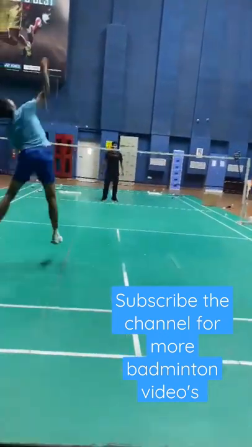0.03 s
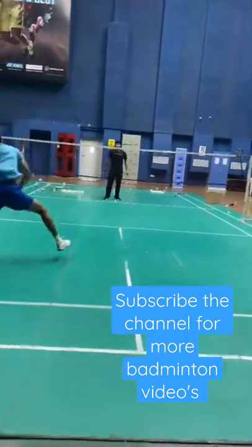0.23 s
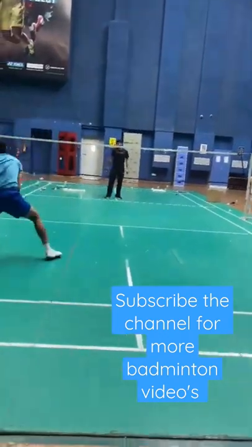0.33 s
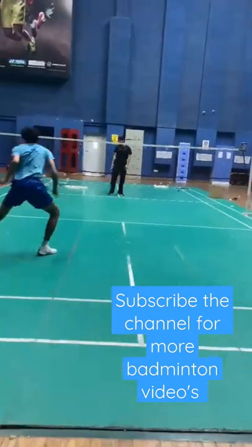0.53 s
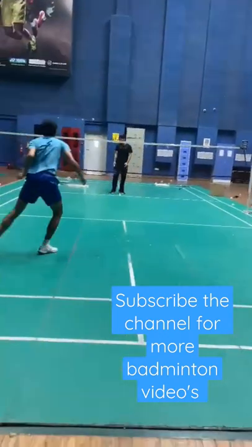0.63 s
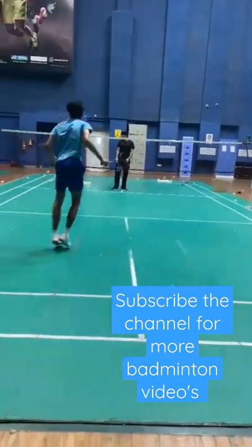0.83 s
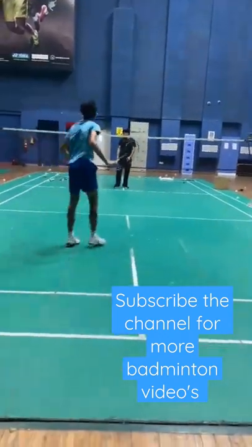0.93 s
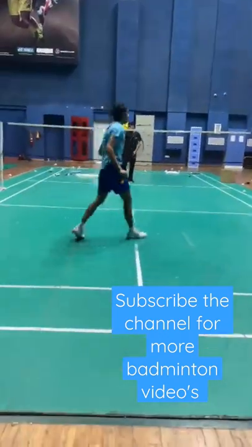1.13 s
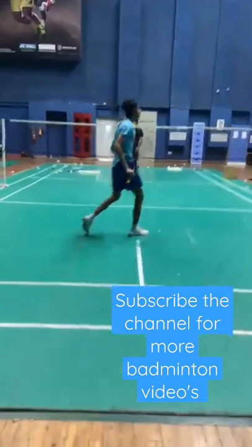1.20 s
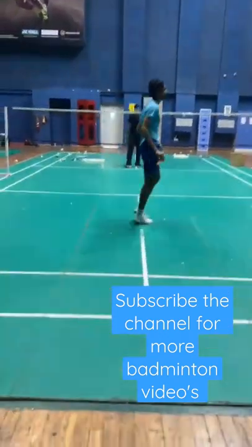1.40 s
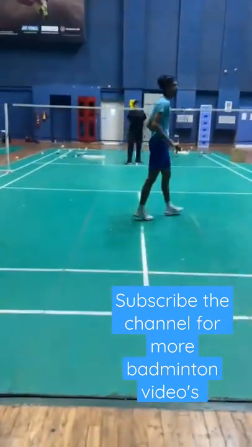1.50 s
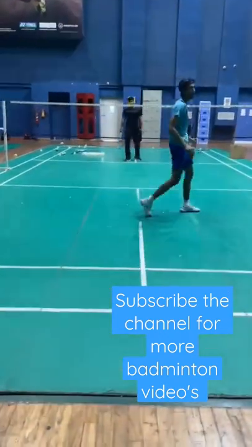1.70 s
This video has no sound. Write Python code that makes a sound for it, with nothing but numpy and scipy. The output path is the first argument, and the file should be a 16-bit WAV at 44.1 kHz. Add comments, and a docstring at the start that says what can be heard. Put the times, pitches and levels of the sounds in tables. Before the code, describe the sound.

One sharp badminton smash, with a quick swish before it, rings through a large sports hall. A phone a few metres off picks up the slapping, thudding landing, then quieter steps over a low room rumble.

```python
"""A racket swishes and cracks against a shuttle: a badminton smash in a large sports hall.
The strings ring briefly; the player lands, soles slapping the mat and the sprung floor booming,
then walks off while the hall rings out over its steady air noise.
Heard from a few metres away, through the two microphone ports of a phone."""
import sys
import numpy as np
from scipy import signal
from scipy.fft import rfft, irfft
from scipy.io import wavfile

SR = 44100
rng = np.random.default_rng(int(sys.argv[2]) if len(sys.argv) > 2 else 0)


def digitize_waveform(pressure):
    """Quantize a signal to 16-bit integers and store it at the path in sys.argv[1].

    Rows of a 2-D input are taken as channels; values are limited to [-1, 1].
    """
    field = np.atleast_2d(pressure).T
    bounded = np.clip(field, -1, 1)
    quanta = np.round(bounded * 32767).astype(np.int16)
    wavfile.write(sys.argv[1], SR, quanta)


N = 77175
SMASH_S = .229
OPPOSED = np.array([[1], [-1]])  # plus at the left port, minus at the right

# Spectrum of the crack, a few metres off: freq_hz, relative_db
CRACK_SPECTRUM = [(200, -10), (450, 2), (750, 4), (1200, -1), (1700, -7), (2700, -0.5), (4500, -2),
                  (5900, 0.5), (7000, -2), (7900, -19), (9000, -11), (10800, -5), (12000, -24)]


def smash():
    """Cork on strings: a crack, heard again by way of the floor, and the shuttle's hollow pop."""
    floor_bounce_s = .0033
    blows = sum(burst(SMASH_S + lag, rise_s=.00067, decay_s=.0037) for lag in (0, floor_bounce_s))
    crack = undb(-13) * coloured(CRACK_SPECTRUM) * blows
    pop = boom(SMASH_S + .0015, level_db=-8.5, pitch_hz=297, rise_s=.0036, steepness=3.6)
    return crack + pop


# Modes of the string bed: pitch_hz, level_db, t60_s
STRING_MODES = [(1247, -22.5, .045), (2063, -27, .04), (2590, -26, .045), (2767, -19.5, .05),
                (3155, -26, .045), (3380, -18.5, .045), (3748, -20, .045), (4206, -24, .04),
                (4414, -24, .05), (4640, -22, .055), (5056, -20.5, .04), (5420, -22, .03),
                (5663, -17.5, .035), (5900, -18, .035), (6090, -21, .035), (8950, -30, .03),
                (10790, -28, .035)]


def strings():
    """The string bed rings briefly; its modes reach the two ports out of step."""
    t, out = clock(), 0
    for hz, db, t60 in STRING_MODES:
        port_phase = np.arctan(undb(along_hz(hz, STEREO_WIDTH))) * OPPOSED
        envelope = undb(db) * burst(SMASH_S, rise_s=.002, decay_s=t60 / np.log(1000))
        out = out + envelope * np.sin(2 * np.pi * (hz * t + rng.random()) + port_phase)
    return out


# Whistle of the racket frame through the stroke: time_s, pitch_hz, level_db
WHISTLE_PATH = [(.172, 400, -62), (.193, 640, -42), (.207, 860, -34), (.218, 1100, -41), (.229, 1300, -41),
                (.245, 900, -64)]
# Brief hiss just before the crack: freq_hz, relative_db
HISS_SPECTRUM = [(1000, 7.5), (2700, 9), (3600, 3), (5000, 5.5), (7000, 0), (12000, 1)]


def swing():
    """Eddies off the frame whistle higher as the racket speeds up; a hiss swells before the crack."""
    t = clock()
    times, hz, db = np.array(WHISTLE_PATH).T
    mean_hz, relative_width = hz.mean(), .097
    eddies = signal.hilbert(noise(np.exp(-.5 * ((bins() / mean_hz - 1) / relative_width) ** 2)))
    glide = np.exp(2j * np.pi * np.cumsum(np.interp(t, times, hz) - mean_hz) / SR)
    envelope = undb(np.interp(t, times, db)) * (t > times[0]) * (t < times[-1])
    hiss_rise = np.exp(-abs(t - SMASH_S) / .011) * (t < SMASH_S)
    return (eddies * glide).real * envelope + undb(-23.5) * coloured(HISS_SPECTRUM) * hiss_rise


# Soles on the court mat: start_s, level_db, crest_pitch_hz, rise_s, scuff_relative_db
SOLE_SLAPS = [(.3098, -18.5, 1600, .0042, -8), (.4345, -11.5, 1370, .0021, -10),
              (.4444, -19.5, 900, .0015, -9), (1.0503, -35, 600, .0012, -2), (1.278, -48, 1200, .0023, 8)]
# Scuff of a sole: freq_hz, relative_db
SCUFF_SPECTRUM = [(300, 12), (750, 5), (1200, 7.5), (1900, 5), (2600, 2.5), (4200, 1.5), (6200, -14),
                  (7600, -6), (9000, -11), (11000, -16), (13000, -35)]


def soles():
    """Each sole squeezes air out from the mat: a hard clap that sweeps down in pitch, and a scuff."""
    fall_octaves = .8  # from first touch to the crest
    out, friction = 0, coloured(SCUFF_SPECTRUM)
    for start, db, hz, rise, scuff_db in SOLE_SLAPS:
        pitch = hz * 2 ** (fall_octaves * (1 - age(start) / rise))
        phase = 2 * np.pi * (np.cumsum(pitch) / SR + rng.random())
        clap = swell(start, rise, steepness=6.2) * np.sin(phase)
        scuff = undb(scuff_db) * swell(start, rise, steepness=1.35) * friction
        out = out + undb(db) * (clap + scuff)
    return out


# Heels on the boards: start_s, level_db, pitch_hz, rise_s
HEEL_KNOCKS = [(.316, -19, 280, 0.004), (.433, -30, 308, 0.011), (.437, -27.5, 729, 0.0081),
               (.492, -24.5, 306, 0.0081), (1.115, -43, 271, 0.017), (1.246, -47.5, 303, 0.025)]
# Weight coming down on the floor: start_s, level_db, pitch_hz, rise_s
FLOOR_THUDS = [(.326, -20.5, 79.6, 0.027), (0.371, -23.5, 80, 0.017), (0.405, -22, 98.5, 0.045),
               (0.4431, -6, 98, 0.018), (0.482, -15, 107.5, 0.019), (0.509, -29, 90, 0.0039),
               (0.567, -21.5, 93.7, 0.016), (0.663, -27, 88.6, 0.0088), (0.821, -40, 83, 0.016),
               (0.932, -32, 91, 0.02), (1.082, -26.5, 89.6, 0.022), (1.143, -29.5, 98, 0.008),
               (1.237, -29.5, 95.5, 0.011), (1.298, -24.5, 94.6, 0.015), (1.43, -33.5, 101.5, 0.021)]


def sprung_floor():
    """Heels knock on the boards and the floor booms under the weight."""
    knocks = sum(boom(*row, steepness=1.48) for row in HEEL_KNOCKS)
    thuds = sum(boom(*row, steepness=2.68) for row in FLOOR_THUDS)
    return knocks + thuds


# Reverberation of the hall: freq_hz, level_db, t60_s
HALL_DECAY = [(40, -24, 0.67), (100.5, -18.5, 0.32), (155, 6, 1.9), (262, -7.5, 1.38), (600, -5, 2.7),
              (880, 1, 2.22), (1390, 3, 1.24), (1680, 2, 1.47), (3020, 0, 1.76), (4440, -2.5, 1.54),
              (5970, -7.5, 1.26), (7800, -7, 0.83), (11500, -13.5, 1.34)]
# Tones the hall favours: pitch_hz, width_hz, boost_db
HALL_TONES = [(302, 58, 5.5), (513, 70, 13.5), (735, 48, 2), (987, 24, 4.5), (1433, 21, 9.5),
              (1478, 27, 9.5), (2240, 120, 2.5), (2980, 97, 3.5), (4140, 16, 2)]
# Near scatter, a gap, then the far walls: delay_s, gain_db
HALL_ARRIVALS = [(0, -16), (.012, 2), (.03, -4.5), (.055, -7), (.08, -1), (.2, 1.5)]


def hall_response():
    """Early scatter, then the far walls answer and the hall rings out; the lows come late."""
    t, f = clock(), bins()
    bass_build_s, bass_below_hz = .05, 600
    tones_db = sum(db / (1 + (2 * (f - hz) / width) ** 2) for hz, width, db in HALL_TONES)
    diffuse = rfft(noise(1)) * undb(along_hz(f, HALL_DECAY) + tones_db)
    centres = np.geomspace(40, 12000, num=16)
    response = 0
    for hz, pick in zip(centres, np.eye(len(centres))):
        decay_s = along_hz(hz, HALL_DECAY, column=2) / np.log(1000)
        band = irfft(diffuse * np.interp(f, centres, pick), N)
        build_up = 1 - np.exp(-(t / bass_build_s) ** 2 * (1 + (hz / bass_below_hz) ** 4))
        tail = np.exp(-t / decay_s) * np.sqrt(2 / (decay_s * SR))  # unit energy
        response = response + band * build_up * tail
    return response * undb(np.interp(t, *np.array(HALL_ARRIVALS).T))


def reflections(rays):
    """Sound leaves differently in each direction; reflections carry one direction after another."""
    handover_hz = 35
    shares = irfft(rfft(rng.standard_normal((len(rays), N))) * (bins() < handover_hz), N)
    shares /= np.sqrt(np.sum(shares ** 2, axis=0))
    response = hall_response()
    return sum(signal.fftconvolve(ray[:1], response * share, axes=1)[:, :N]
               for ray, share in zip(rays, shares))


# Room tone of the hall: freq_hz, relative_db
AIR_SPECTRUM = [(20, -36), (45, -5.5), (85, -1), (120, -5), (160, -12.5), (240, -11), (310, -14.5),
                (400, -20.5), (600, -21), (850, -22.5), (1300, -28.5), (2400, -32), (4500, -36.5),
                (6200, -44), (7300, -43.5), (8400, -42.5), (11500, -50.5)]
# Level of the background as heard through the phone: time_s, level_db
BACKGROUND_LEVEL = [(0, -41), (.15, -43), (0.801, -41), (1.149, -42), (1.422, -42.5), (1.58, -41.5),
                    (1.72, -40.5)]


def air():
    """Steady rumble and hiss of the hall; the level heard dips slightly, then rises near the end."""
    return coloured(AIR_SPECTRUM) * undb(np.interp(clock(), *np.array(BACKGROUND_LEVEL).T))


# Spread between the microphone ports: freq_hz, side_over_mid_db
STEREO_WIDTH = [(50, -39), (130, -61), (260, -33.5), (480, -9), (800, -6), (1200, -8), (1700, -7),
                (2300, 1), (3200, 1), (4500, -4), (8000, -3), (11000, -12)]


def noise(gain):
    """Stereo noise of rms 1, shaped by gain; alike at both ports in the bass, wider in the treble."""
    width = undb(along_hz(bins(), STEREO_WIDTH))
    mid, side = rfft(rng.standard_normal((2, N))) * gain / np.sqrt(1 + width ** 2)
    stereo = irfft(mid + side * width * OPPOSED, N)
    return stereo / stereo.std()


def coloured(spectrum):
    return noise(undb(along_hz(bins(), spectrum)))


def burst(start_s, rise_s, decay_s):
    """Quick attack, exponential release."""
    t = age(start_s)
    return np.minimum(t / rise_s, 1) * np.exp(-np.maximum(t - rise_s, 0) / decay_s)


def swell(start_s, rise_s, steepness):
    """Rises to a crest of 1; the steeper it is, the sooner it dies."""
    progress = age(start_s) / rise_s
    return (progress * np.exp(1 - progress)) ** steepness


def boom(start_s, level_db, pitch_hz, rise_s, steepness):
    """A heavily damped low resonance that swells to a crest and dies."""
    tone = np.cos(2 * np.pi * pitch_hz * age(start_s))
    return undb(level_db) * swell(start_s, rise_s, steepness) * tone


def along_hz(hz, table, column=1):
    """One column of a table, read on a log-frequency axis."""
    rows = np.array(table, float)
    return np.interp(np.log(hz + 1e-3), np.log(rows[:, 0]), rows[:, column])


def undb(db):
    return 10 ** (np.asarray(db) / 20)


def clock():
    return np.arange(N) / SR


def age(start_s):
    return np.maximum(clock() - start_s, 0)


def bins():
    return np.arange(N // 2 + 1) * SR / N


def scene():
    """Racket and feet, heard directly and through the hall along five directions."""
    swish, ring, feet = swing(), strings(), soles() + sprung_floor()
    rays = [swish + smash() + undb(-10) * ring + undb(-7) * feet for _ in range(5)]
    return swish + smash() + ring + feet + reflections(rays) + air()


# Balance of the phone's microphone ports: freq_hz, left_over_right_db
PORT_BALANCE = [(300, 0), (600, 2), (1300, 2.8), (2400, -.3), (5000, -.3), (11000, -1.5)]


def record(dry):
    """The two ports differ in colour; the phone rounds the highest peaks and cuts the top."""
    ceiling, top_hz = .8, 11800
    tilted = irfft(rfft(dry) * undb(along_hz(bins(), PORT_BALANCE) * OPPOSED / 2), N)
    rounded = tilted / (1 + (tilted / ceiling) ** 4) ** .25
    return signal.sosfilt(signal.ellip(10, .2, 90, top_hz, fs=SR, output="sos"), rounded)


dry = scene()
out = record(dry)
digitize_waveform(out)
```